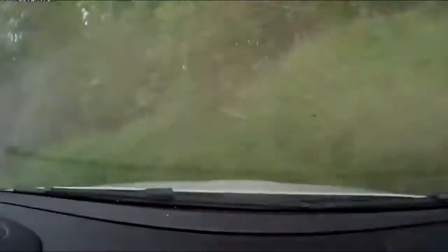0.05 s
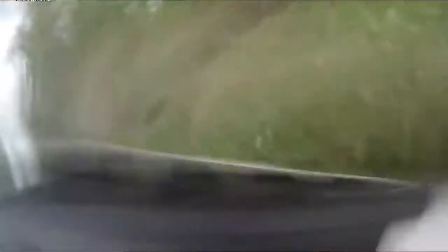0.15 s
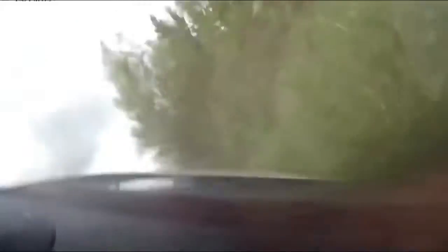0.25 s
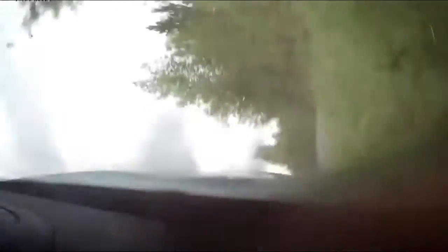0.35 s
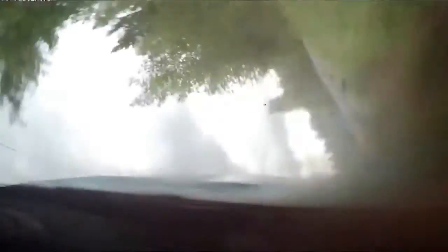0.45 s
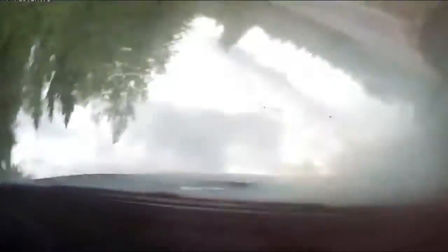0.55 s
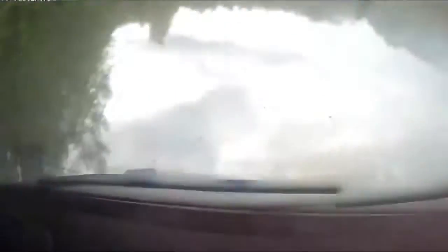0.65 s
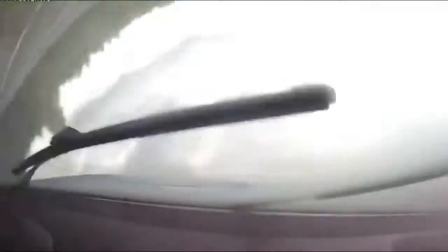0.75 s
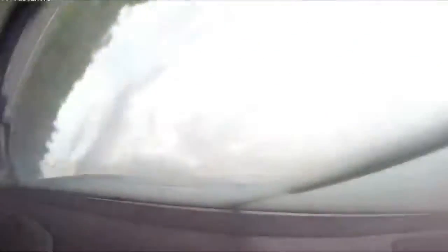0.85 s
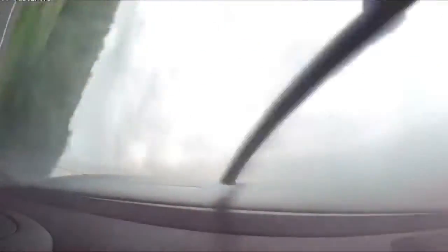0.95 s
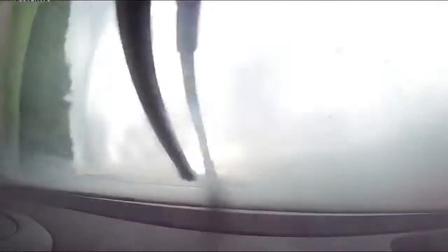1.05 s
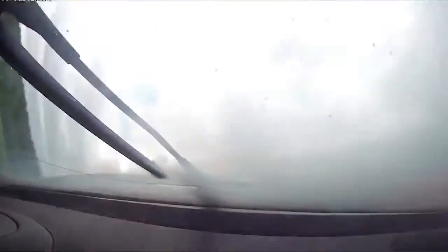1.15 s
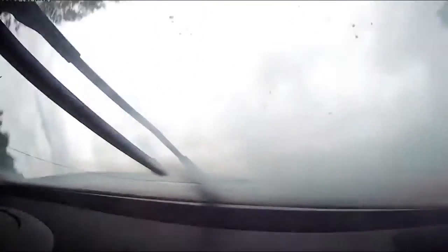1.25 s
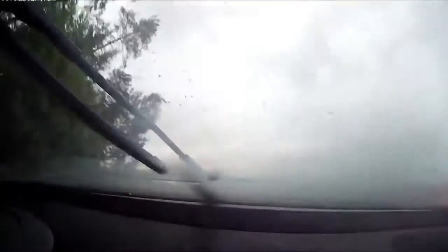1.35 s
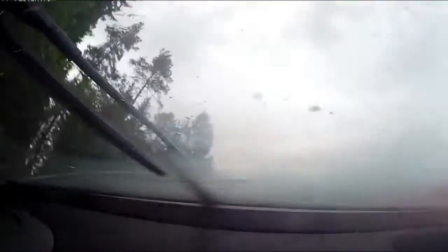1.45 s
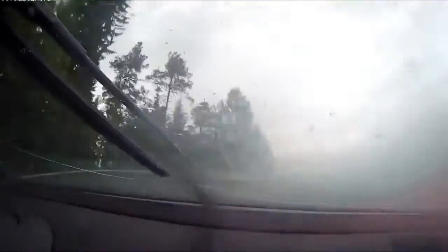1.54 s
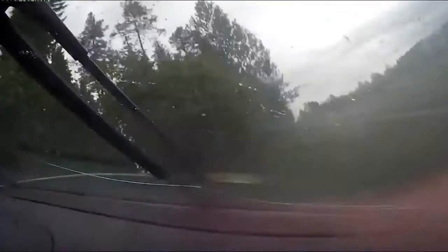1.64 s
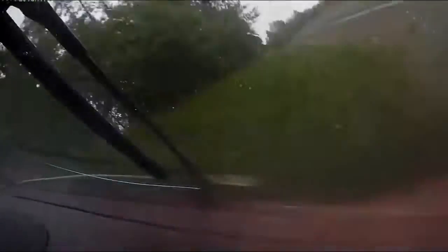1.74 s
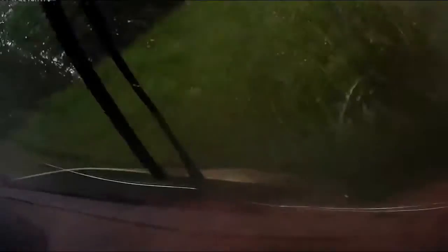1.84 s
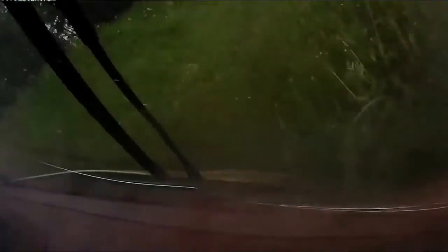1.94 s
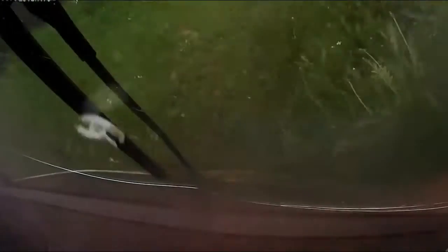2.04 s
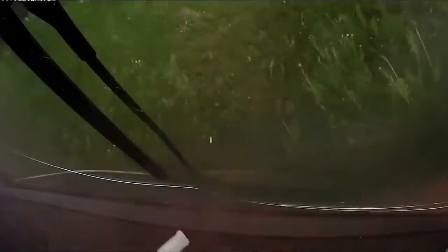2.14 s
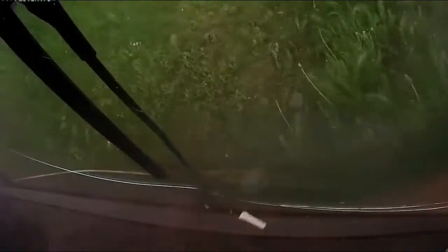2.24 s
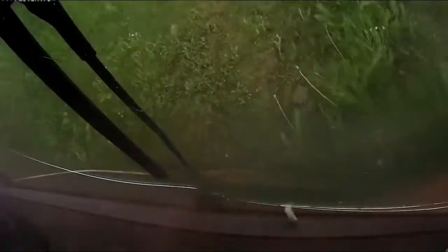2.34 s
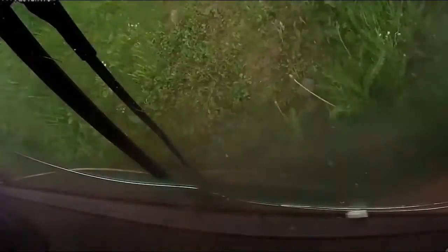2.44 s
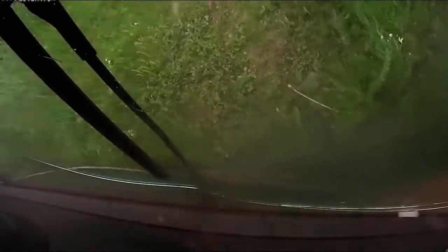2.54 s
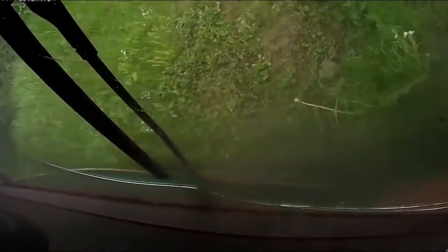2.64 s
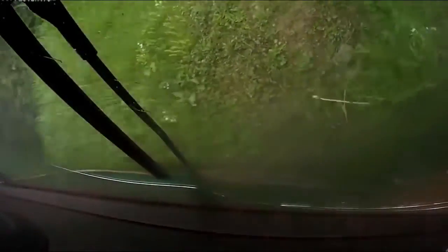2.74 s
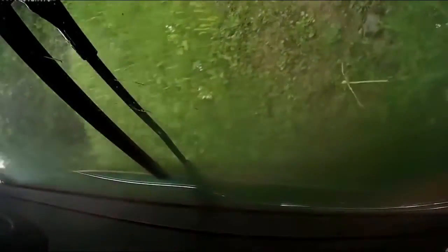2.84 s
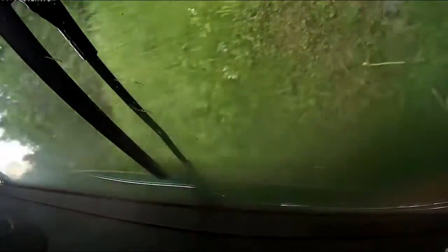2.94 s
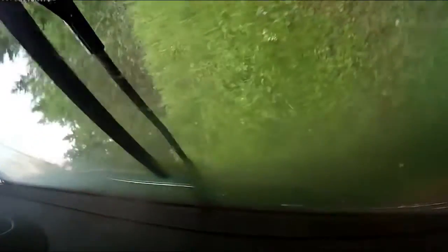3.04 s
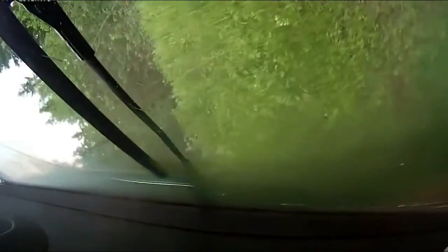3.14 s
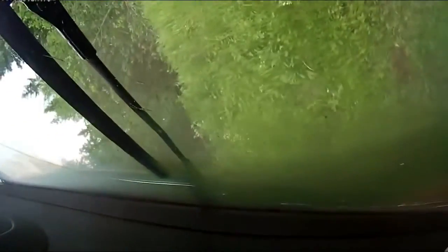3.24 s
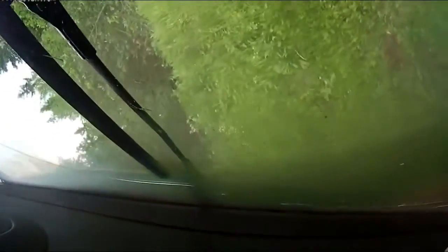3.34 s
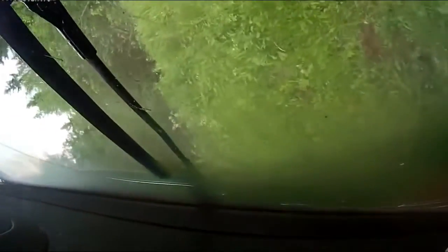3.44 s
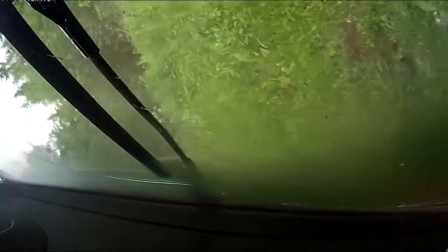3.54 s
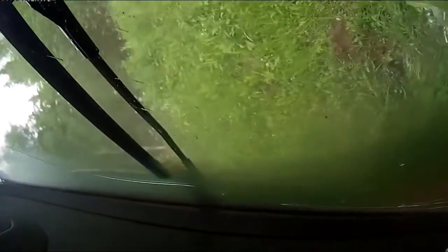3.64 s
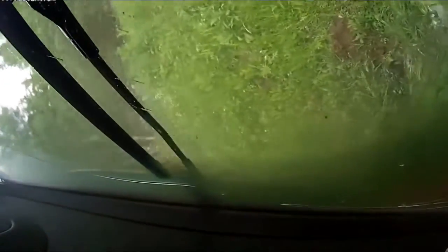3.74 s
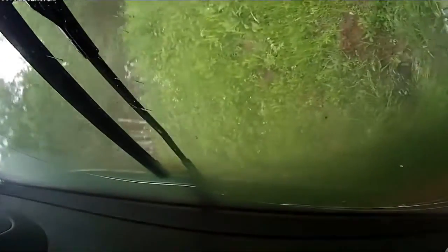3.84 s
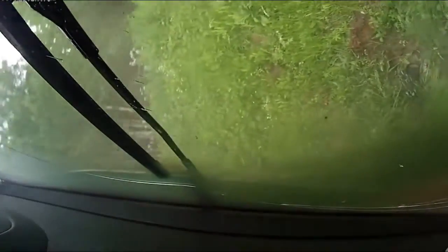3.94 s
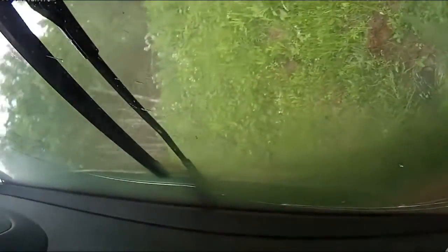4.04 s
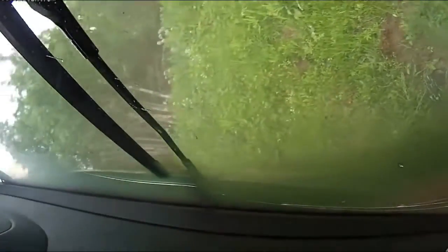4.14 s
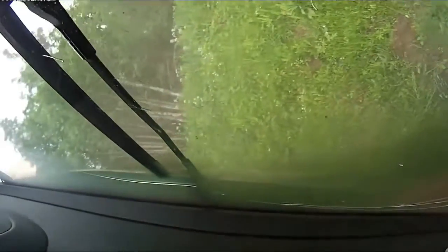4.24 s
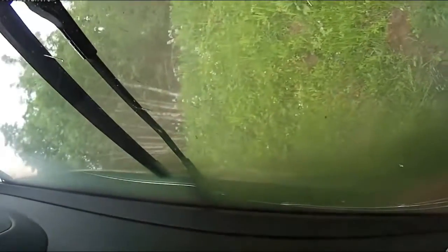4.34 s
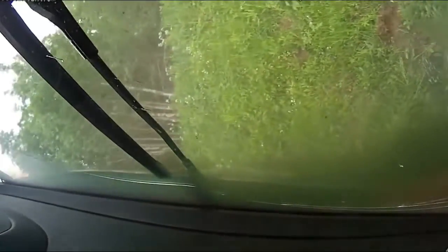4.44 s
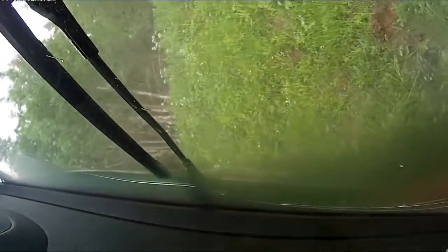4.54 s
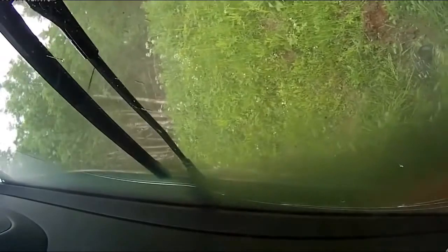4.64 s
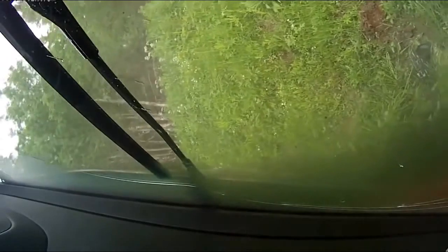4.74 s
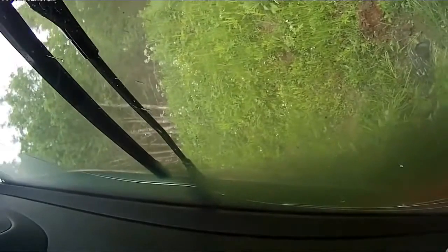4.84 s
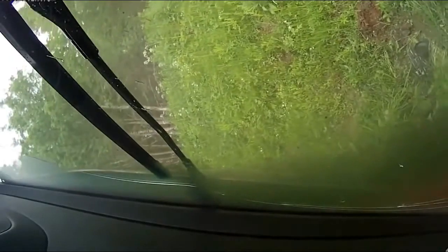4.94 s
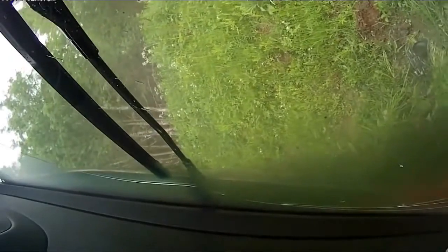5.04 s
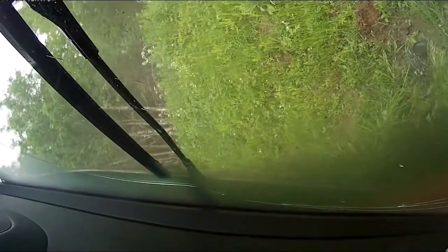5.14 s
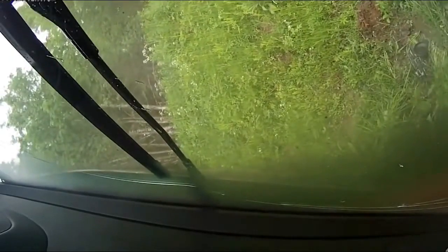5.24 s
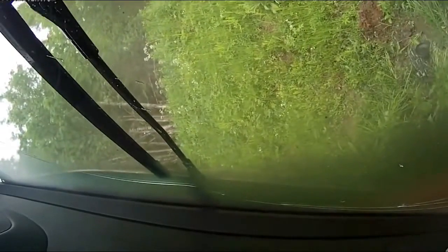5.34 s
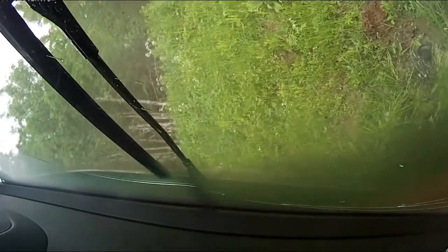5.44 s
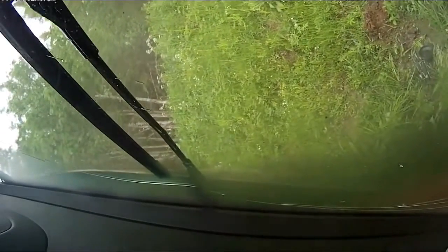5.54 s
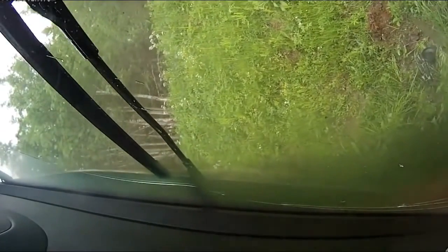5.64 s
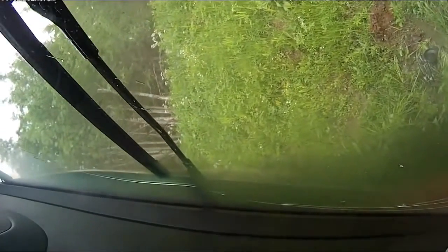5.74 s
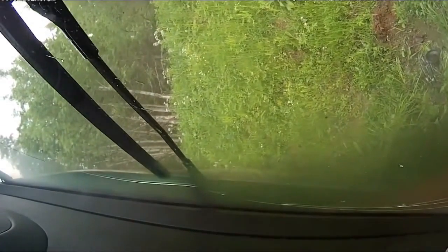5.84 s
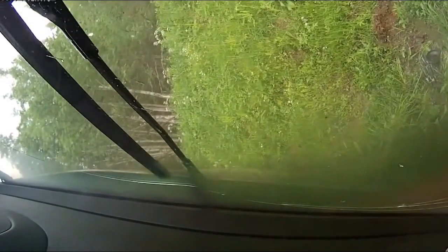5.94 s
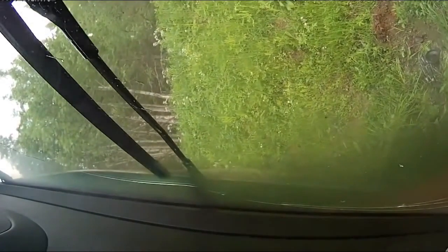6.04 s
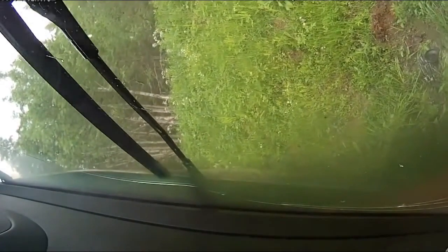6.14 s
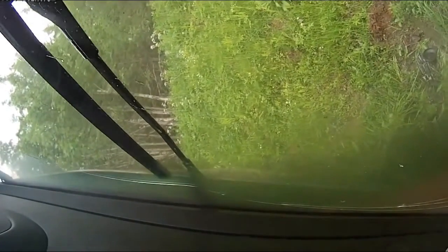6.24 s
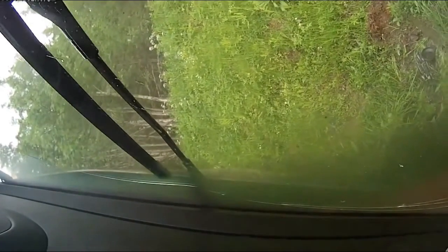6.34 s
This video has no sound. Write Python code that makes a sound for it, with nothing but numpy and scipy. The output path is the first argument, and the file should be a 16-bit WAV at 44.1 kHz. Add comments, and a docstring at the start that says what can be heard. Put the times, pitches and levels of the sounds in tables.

```python
"""A car tumbles off the road into grass, heard by a small microphone on the windscreen.
From the start the shell heaves, panels rattle and debris scratches (shaped noise), while loose things
knock (noise bursts with a note); the cabin answers. A spray of debris bursts at 0.36 s, and from 0.8 s
small metal jingles (decaying modes). Blows return near 2 s and 3 s, then the motion settles.
The loudest bangs overload the input; all sound stops at 6.3 s."""
import sys
import numpy as np
from scipy import signal
from scipy.fft import rfft, irfft, next_fast_len
from scipy.io import wavfile
from scipy.ndimage import uniform_filter1d, map_coordinates

SR = 44100
rng = np.random.default_rng(int(sys.argv[2]) if len(sys.argv) > 2 else 0)


def to_wav(s):
    """Save 16-bit WAV."""
    ch = np.atleast_2d(s).T  # columns
    pcm = np.round(np.clip(ch, -1, 1) * 32767)  # PCM
    wavfile.write(sys.argv[1], SR, pcm.astype(np.int16))


N = 281487
STOP_S = 6.307  # silence follows


def amp(db):
    """Level: decibels to amplitude gain."""
    return 10 ** (np.asarray(db) / 20)


def unit(x):
    """Normalisation: x scaled to rms 1."""
    return x / np.sqrt(np.mean(x ** 2) + 1e-20)


def along(points, hz):
    """Interpolation: (f/Hz, value) points read on a logarithmic frequency axis."""
    f, v = np.transpose(points)
    return np.interp(np.log(hz + 1), np.log(f + 1), v)


def wobble(rate):
    """Slow random modulation: a smooth curve through `rate` random knots per second."""
    knots = rng.standard_normal(1000)
    return map_coordinates(knots, [np.arange(N) * rate / SR])


def coloured(x, gain):
    """Minimum-phase filtering: the folded cepstrum of gain(hz) gives a causal response."""
    m = 2 * next_fast_len(N // 2 + 8192)
    hz = np.fft.rfftfreq(m, 1 / SR)
    cepstrum = irfft(np.log(gain(hz) + 1e-6), m)
    cepstrum[1:m // 2] *= 2
    cepstrum[m // 2 + 1:] = 0
    response = np.exp(rfft(cepstrum))
    return irfft(rfft(x, m) * response, m)[:N]


# how hard the car keeps shaking between blows: (t/s, shake level/dB)
SHAKE = [(0, -28.5), (.26, -42.5), (.76, -31), (.99, -39.5), (1.37, -44), (1.6, -35.5), (1.9, -38),
         (2.19, -34.5), (2.47, -44.5), (2.66, -43.5), (3.1, -31), (3.35, -43.5), (3.56, -42.5), (3.84, -43),
         (4.2, -48), (4.66, -52.5), (4.95, -61.5), (5.09, -69.5), (6.01, -71), (6.24, -83.5)]
# response to the shake; rows heave, panels, debris: (level/dB at a shake of -36 dB, slope/(dB per dB))
FOLLOW = [(-41.5, 1.07), (-39, 0.86), (-46, 0.83)]
# the car hits the ground or something gives way:
# (t/s, hold/s, heave level/dB, panel level/dB, debris level/dB)
BLOWS = [(0.062, 0.16, -20.5, -22.5, -38), (0.334, 0.013, -10.5, -17.5, -34),
         (0.393, 0.014, -38, -24.5, -16.5), (0.479, 0.046, -17.5, -18, -35.5),
         (.58, 0.025, -24, -25, -36.5), (0.642, .021, -30.5, -31.5, -41.5), (0.855, .021, -37, -37, -40),
         (1.449, 0.11, -32, -31.5, -42.5), (1.703, 0.044, -29, -31, -39.5),
         (1.826, 0.0061, -36, -46, -37.5), (1.965, 0.059, -20.5, -20.5, -29),
         (2.024, .08, -27.5, -23.5, -32.5), (2.42, 0.0087, -42, -60, -70), (2.924, 0.024, -52, -32, -45),
         (3.198, 0.036, -23, -30, -34), (3.314, 0.013, -30, -50, -61), (3.608, 0.17, -38, -42, -41.5),
         (3.91, 0.0096, -40, -37, -47.5), (4.318, .011, -50, -41.5, -50.5), (4.447, 0.036, -45, -45, -74),
         (4.533, 0.018, -37.5, -43.5, -45.5), (5.037, 0.035, -59, -64.5, -70)]
# rise before and fall after each blow: (heave, panels, debris) [dB/s]
ATTACK_DB_PER_S = [403, 249, 303]
RELEASE_DB_PER_S = [284, 162, 199]
BURST_S, BURST_DB, BURST_DB_PER_S = .359, -18, 91  # something bursts: onset, level, steady fade


def levels():
    """Power addition of incoherent sources: shake, blows and debris burst, as three levels in dB."""
    t = np.arange(0, N, 64) / SR
    base_db, slope = np.transpose(FOLLOW)[:, :, None]
    shake_db = np.interp(t, *np.transpose(SHAKE))
    power = amp(base_db + slope * (shake_db + 36)) ** 2
    for s, hold, *peak_db in BLOWS:
        rise_db = np.outer(ATTACK_DB_PER_S, np.maximum(s - t, 0))
        fall_db = np.outer(RELEASE_DB_PER_S, np.maximum(t - s - hold, 0))
        power += amp(np.array(peak_db)[:, None] - rise_db - fall_db) ** 2
    burst_db = BURST_DB - BURST_DB_PER_S * (t - BURST_S)
    power[2] += (t >= BURST_S) * amp(burst_db) ** 2
    return [np.interp(np.arange(N) / SR, t, row) for row in 10 * np.log10(power)]


def rattle(rate, spread_db, life_s, bed, patchy_db):
    """Random contacts: `rate` uneven noise bursts per second over a bed; favoured pitches keep shifting."""
    chance, size = rng.random((2, N))
    contacts = (chance < rate / SR) * amp(-spread_db * np.log(size + 1e-9))
    pole = np.exp(-1 / (life_s * SR))
    shape = unit(signal.lfilter([1], np.poly([pole, pole]), contacts))  # each contact swells and lets go
    spectrum = signal.stft((shape + bed) * rng.standard_normal(N), nperseg=256)[2]
    field = uniform_filter1d(rng.standard_normal(spectrum.shape), size=5, axis=0)  # across pitch
    field = uniform_filter1d(field, size=7, axis=1)  # across time
    return unit(signal.istft(spectrum * amp(patchy_db * unit(field)), nperseg=256)[1][:N])


# cabin trim resonances: (f/Hz, half-power width/Hz, level/dB before a common weight)
TRIM = [(247, 60, -5.5), (616.4, 53, -4.5), (680, 61, -10.5), (880, 150, -6.5), (1136, 41, -6),
        (1430, 240, -1.5)]
# panel spectrum: (f/Hz, relative level/dB)
PANELS = [(65, -28.5), (110, 1), (225, -0.5), (490, 0), (671, -1), (753, -4), (948, -2), (2030, -13.5),
          (2310, -24.5), (3400, -20), (4420, -46), (7480, -120)]


def resonant(hz):
    """Modal resonance: the trim's peaks multiply the broad panel spectrum."""
    peaks = sum(amp(db) * w / np.sqrt(w * w + 4 * (hz - c) ** 2) for c, w, db in TRIM)
    return amp(along(PANELS, hz)) * (1 + 0.66 * peaks)


def sparkle(rate):
    """Free decay of small hard bodies: bits ping at scattered high pitches, `rate` per second."""
    out, t = np.zeros(N + SR), np.arange(SR // 20) / SR
    for when, pitch, size, life in rng.random((round(rate * N / SR), 4)):
        ring = np.sin(2 * np.pi * 2500 * 6 ** pitch * t) * (1 - np.exp(-t / 0.0019))
        t60 = 0.024 + 0.033 * life
        out[int(when * N):][:len(t)] += amp(12 * size - 60 * t / t60) * ring
    return unit(out[:N])


# shell heave spectrum: (f/Hz, relative level/dB)
HEAVE = [(7.1, -26.5), (12, 1), (35, 1.5), (70, -7), (102, -8.5), (156, -11), (200, -13.5), (260, -35.5),
         (440, -120)]
# debris spectrum, also shaping the bright parts of knocks: (f/Hz, relative level/dB)
DEBRIS = [(1060, -21), (1800, -5.5), (2080, -5.5), (2320, -10), (3630, -5), (4590, -13), (6590, -10.5),
          (7210, -14), (9030, -11.5), (10100, -21.5), (13400, -15), (14700, -17), (15500, -15.5)]


def tumble():
    """Noise excitation of structures: the shell heaves, panels and trim rattle, grit and grass scratch."""
    heave_db, panel_db, debris_db = levels()
    jolt = wobble(22)  # quick jolts shake panels and debris together
    heave = unit(coloured(rng.standard_normal(N), lambda hz: amp(along(HEAVE, hz))))
    panels = rattle(90, spread_db=3.0, life_s=0.0059, bed=1.0, patchy_db=1.0)
    panels = unit(coloured(panels, resonant))
    debris = rattle(93, spread_db=2.0, life_s=0.01, bed=1.6, patchy_db=4.0)
    debris = unit(coloured(debris, lambda hz: amp(along(DEBRIS, hz))))
    debris = debris + amp(-15) * sparkle(140)
    return (amp(heave_db + 1.8 * wobble(14)) * heave
            + amp(panel_db + 0.22 * jolt) * panels
            + amp(debris_db + .7 * jolt + 1.3 * wobble(30)) * debris)


STRAY_PER_S, STRAY_DB, STRAY_SPREAD_DB = 14, 7, 3  # rate, level over the shake, scatter either way


def strays():
    """Random point events: small knocks whose level follows the shake, in rows like KNOCKS."""
    when, size, soft, pitch, length = rng.random((round(STRAY_PER_S * STOP_S), 5)).T
    s = when * STOP_S
    db = np.interp(s, *np.transpose(SHAKE)) + STRAY_DB + STRAY_SPREAD_DB * (2 * size - 1)
    return list(zip(s, db, 6 + 10 * soft, 250 * 5 ** pitch, 4 + 9 * length))


# knocks of loose things: (t/s, level/dB of note and unfiltered thud,
# softness/dB lost from thud to crack, note f/Hz, contact length/ms before scaling)
KNOCKS = [(0.0454, -1.5, 15.5, 221, 8.2), (0.0511, -2.5, 9.5, 218, 4), (0.0642, -4, 14.5, 329, 8.8),
          (0.0785, -8.5, 5, 264, 2.2), (0.0949, -15, 5, 328, 5), (.114, -4.5, 8.5, 1230, 1.9),
          (0.1223, -16, 4.5, 342, 2.7), (.1358, -17, 12, 994, 8), (0.153, -11, 7, 1040, 1.7),
          (.178, -11, 10.5, 280, 4.3), (.194, -4.5, 14, 216, 8.1), (0.2108, -11, 8, 363, 2.8),
          (0.223, -15.5, 9, 439, 1.7), (.316, -13.5, 7, 350, 10.5), (.329, -6, 13, 229, 7.9),
          (.34, -7.5, 10.5, 970, 4.5), (.359, -9, -2.5, 905, 10.6), (.3659, -11, 4, 816, 7.3),
          (.493, -8, 15.5, 606, 4.6), (0.5608, -19.5, 5, 436, 2.6), (.598, -12.5, 21, 735, 6.4),
          (.673, -17, 15, 240, 2.2), (.705, -32.5, 0, 250, 8.5), (0.776, -27.5, 4, 680, 13),
          (0.8438, -33, -3.8, 404, 8.1), (1.0229, -34.5, 21, 906, 10), (1.1245, -38.5, 26, 583, 6.4),
          (1.231, -34.5, 1.5, 503, 5.2), (1.4411, -25.5, 29, 201, 18), (1.5024, -22, 7, 1190, 4.2),
          (1.5708, -36.5, -4, 374, 8.9), (1.679, -21, 11, 233, 3.1), (1.717, -26, 3, 218, 2),
          (1.92, -21.5, 9.5, 236, 5.6), (1.931, -13, 13, 233, 6.9), (1.945, -14.5, 11, 303, 13),
          (1.968, -11.5, 5.5, 1050, 4.8), (1.9833, -7.5, 4.5, 550, 2.6), (2.014, -15.5, 7, 342, 6.9),
          (2.0584, -17.5, 6.5, 550, 13), (2.095, -16.5, 4, 298, 9.3), (2.1692, -34.5, 3, 368, 26),
          (2.228, -40.5, -2.3, 590, 5.1), (2.301, -24.5, 11, 673, 5.6), (2.3936, -23, -1, 1180, 5.8),
          (2.4232, -28, -2, 385, 3.8), (2.4565, -37.5, 2, 1400, 7.3), (2.579, -37, 0.2, 820, 5.5),
          (2.627, -42.5, -8, 673, 5.4), (2.6381, -35, -7, 1770, 4), (2.65, -38.5, -10, 960, 6.7),
          (2.77, -30.5, 11.5, 500, 7.5), (2.823, -23, 5, 953, 7.4), (2.9061, -23, 4, 300, 2.8),
          (2.915, -22, 7, 590, 6.3), (3.038, -11, 7, 685, 3.3), (3.0566, -30, 1, 624, 10),
          (3.09, -25, 1.8, 890, 10.3), (3.16, -26.5, 17, 550, 15), (3.194, -20, 20, 293, 4.6),
          (3.233, -23, 20, 890, 3.7), (3.2675, -18.5, 3.2, 870, 7.8), (3.347, -33, 14, 750, 16),
          (3.608, -18, 13, 896, 3.05), (3.7, -24, 11, 445, 7.9), (3.74, -32, 1.5, 980, 6.1),
          (3.891, -32, 13, 300, 7.1), (3.919, -27.5, 8.5, 883, 6.5), (4.03, -35, 3, 860, 7.9),
          (4.087, -41, 0, 290, 4.7), (4.138, -44.5, -0.2, 377, 6.7), (4.239, -37.5, 8, 420, 6),
          (4.264, -47.5, -2.5, 860, 8.8), (4.2842, -47, -2.5, 1080, 5.2), (4.309, -35, 14, 257, 8.6),
          (4.3462, -47.5, 0, 920, 19), (4.4214, -35, 18, 690, 5.3), (4.506, -29, 25, 940, 6.6),
          (4.5315, -34.5, 11, 262, 9), (4.61, -40, 6, 227, 7), (4.695, -34, 29, 506, 4.6),
          (4.842, -47, 4.5, 900, 22), (4.9048, -35.5, 6.5, 393, 6.6), (5.0055, -56.5, 2, 590, 10.6),
          (5.064, -45.5, 13.5, 352, 8), (5.165, -62.5, 1, 504, 8), (5.2954, -54, 15, 433, 7.3),
          (5.44, -62.5, 7, 702, 13), (5.507, -52.5, 10.5, 523, 6.6), (5.6276, -49, 4, 630, 11.4),
          (6.303, -31.5, 20.5, 522, 4.6)]
# chatter after a knock, before its envelope; rows thud, crack, edge: (level/dB below the knock's peak)
TAIL_DB = [
    [-14],
    [-20],
    [-26],
]
EDGE_LOSS, TAIL_S = 2.02, 0.025  # softness steps lost by the edge; time constant of the chatter


def knocks():
    """Impact excitation: a short contact drives a note, a trim thud, a crack and a bright edge."""
    drive, t = np.zeros((4, N + SR)), np.arange(SR // 10) / SR
    linger = np.array([[1.3], [1.01], [.9]])  # low parts last longer
    for s, thud_db, soft_db, note_hz, ms in KNOCKS + strays():
        u = t / (0.47 * max(ms, 1.5) / 1000 * linger)  # time in units of the rise to the peak
        part_db = [[thud_db], [thud_db - soft_db], [thud_db - EDGE_LOSS * soft_db]]
        shape = amp(part_db) * (u * np.exp(1 - u)) ** 2.56  # the contact swells and lets go
        note = shape[0] * np.sin(2 * np.pi * note_hz * t)
        peak = shape.max(axis=1, keepdims=True)
        shape = shape + amp(TAIL_DB) * peak * (1 - np.exp(-u)) * np.exp(-t / TAIL_S)
        bursts = shape * rng.standard_normal((3, len(t)))
        drive[:, round(s * SR):][:, :len(t)] += np.vstack([bursts, note])

    def dull(hz):
        """Low-pass filtering: the crack lies below 6 kHz, the edge above."""
        return 1 / np.sqrt(1 + (hz / 6000) ** 8)

    thud = coloured(drive[0, :N], lambda hz: amp(8.5) * resonant(hz))
    crack = coloured(drive[1, :N], lambda hz: amp(14 + along(DEBRIS, hz)) * dull(hz))
    edge = coloured(drive[2, :N], lambda hz: amp(16.5 + along(DEBRIS, hz)) * np.sqrt(1 - dull(hz) ** 2))
    return drive[3, :N] + thud + crack + edge


# reverberation of the cabin: (f/Hz, t60/s)
CABIN = [(200, .12), (1500, .07), (10000, .035)]


def cabin(x):
    """Reverberation: the small padded cabin answers; reflections change as the car turns over."""
    out, hop = np.zeros(N + SR), SR // 4  # new reflections every quarter second
    for start in range(0, N, hop):
        hz, t, spectrum = signal.stft(rng.standard_normal(SR // 4), SR, nperseg=256)
        decay = amp(-60 * t / along(CABIN, hz)[:, None])
        tail = signal.istft(spectrum * decay, SR, nperseg=256)[1]
        wet = signal.fftconvolve(x[start:start + hop], tail / np.linalg.norm(tail))
        out[start + 100:][:len(wet)] += wet  # delayed by 100 samples
    return out[:N]


# jingles of small metal: (t/s, level/dB before mode scatter, chatter/dB before scaling)
JINGLES = [(.781, -37, 6), (.809, -38, 8), (.839, -33, 9), (1.569, -35, 12), (2.628, -36, 7),
           (2.656, -39, 2), (2.907, -41, 11), (3.272, -40, 9), (3.411, -41, 11), (3.457, -41, 4),
           (3.52, -47, 7), (3.578, -49, 3), (3.64, -42, 9), (3.72, -51, 4), (3.9, -51, 8), (4.031, -53, 2),
           (4.17, -54, 4)]
# modes of the metal: (f/Hz, level/dB, t60/s when untouched)
METAL = [(4700, -16, 0.12), (5250, -14, 0.15), (8215, -2, 0.32), (11110, -6, 0.15), (12400, -9, 0.17),
         (14300, -7.5, .13), (14580, -2, .13)]


def jingles():
    """Modal decay with contact damping: keys and coins ring anew on every contact, chattering as they touch."""
    out, t = np.zeros(N + SR), np.arange(SR // 4) / SR
    for s, db, chatter_db in JINGLES:
        scatter = rng.standard_normal((len(METAL), 2))
        for (hz, level, t60), (size, bend) in zip(METAL, scatter):
            rows, knots = [[0], [1]] + 0 * t, t * 300  # two random curves, 300 knots per second
            shake = map_coordinates(rng.standard_normal((2, 100)), [rows, [knots, knots]])
            phase = 2 * np.pi * hz * (1 + .003 * bend) * t + .12 * chatter_db * shake[1]
            ring = amp(.6 * chatter_db * shake[0]) * np.sin(phase) * (1 - np.exp(-t / .004))
            life = t60 * amp(-.6 * chatter_db)  # touching damps the ring
            out[round(s * SR):][:len(t)] += amp(db + level + 4.5 * size - 60 * t / life) * ring
    return out[:N]


def scene():
    """Superposition: direct knocks and jingles, their reverberation, and the tumble."""
    near = knocks() + jingles()
    return (near + amp(-12) * cabin(near) + tumble())[None]


# microphone self-noise spectrum: (f/Hz, relative level/dB)
HISS = [(18, -34.5), (30, -6), (53, -15), (90, -22.5), (526, -32.5), (889, -32.5), (2540, -44),
        (14400, -49.5), (16000, -70.5)]
TOP_HZ = 16400  # upper band limit


def record(dry):
    """Transducer limits: self-noise, slow bias drift, flattened loud peaks, the stop and a band limit."""
    hiss = unit(coloured(rng.standard_normal(N), lambda hz: amp(along(HISS, hz))))
    x = dry[0] + amp(-68.5) * hiss + amp(-53) * wobble(.5)
    x = x / (1 + np.abs(x / .45) ** 8) ** (1 / 8)  # overload: peaks flatten towards 0.45
    x = x * (np.arange(N) < STOP_S * SR)
    m = next_fast_len(N + 8192)
    hz = np.fft.rfftfreq(m, 1 / SR)
    gain = amp(-.04 * np.maximum(hz - 15300, 0)) * (hz < TOP_HZ)  # treble fades before the limit
    return irfft(rfft(x, m) * gain, m)[None, :N]


dry = scene()
out = record(dry)
to_wav(out)
```